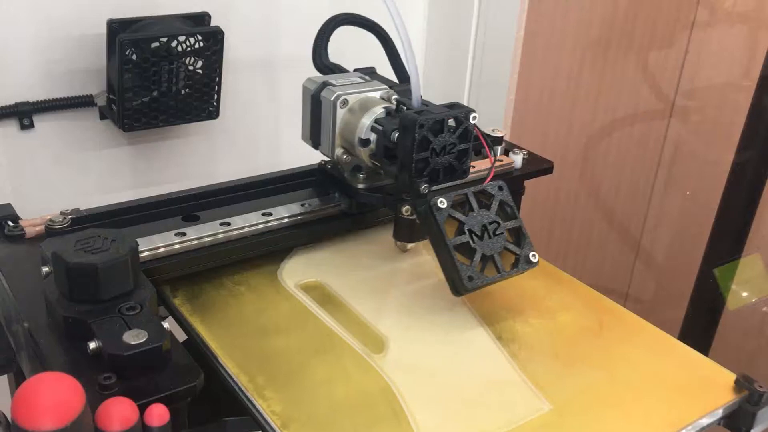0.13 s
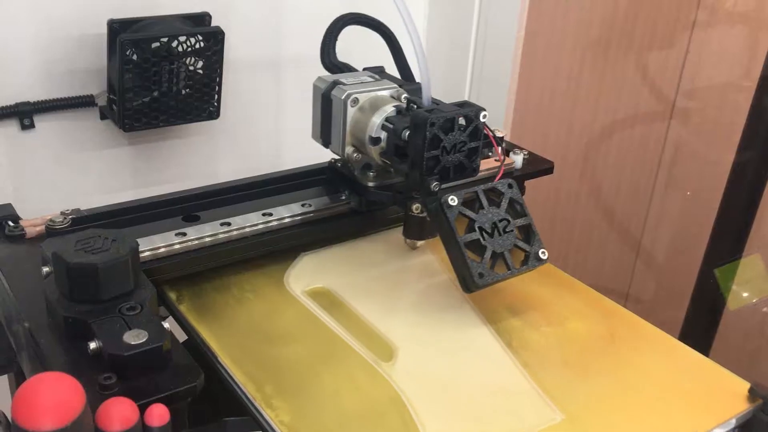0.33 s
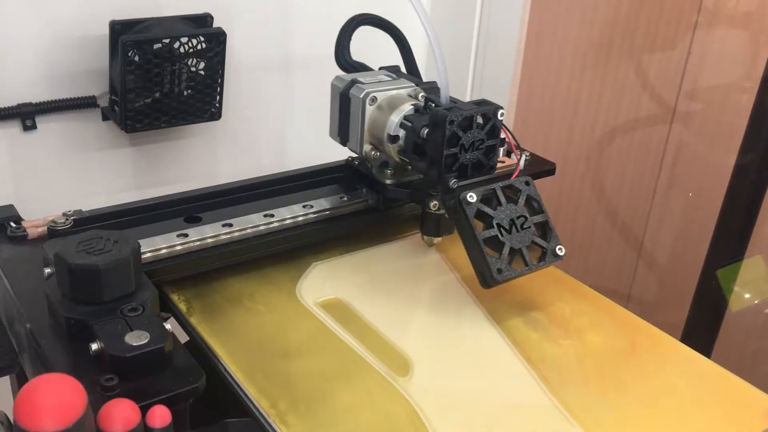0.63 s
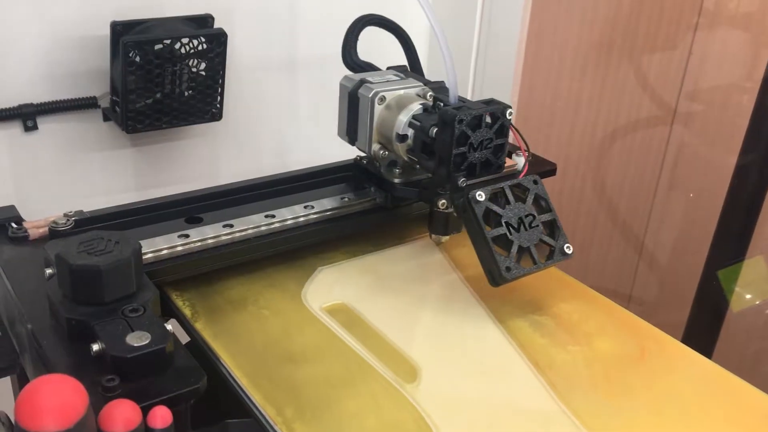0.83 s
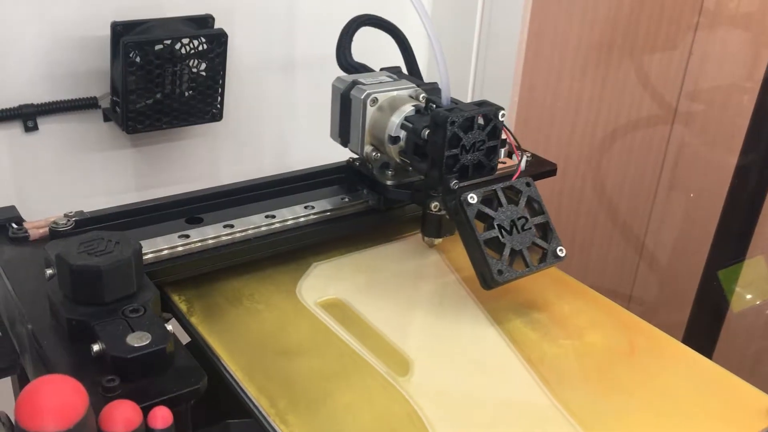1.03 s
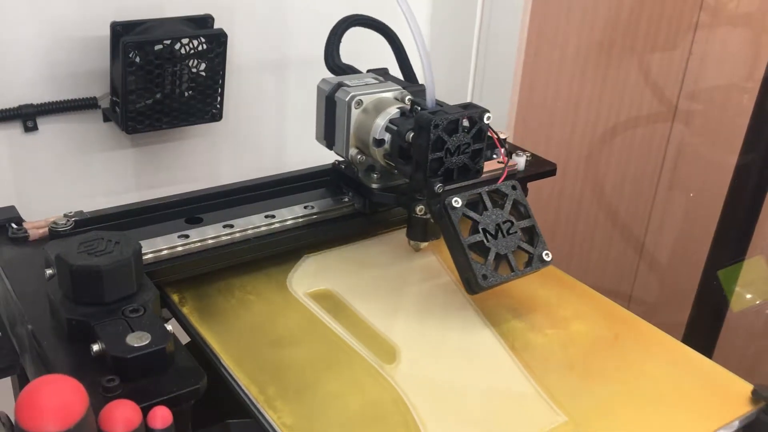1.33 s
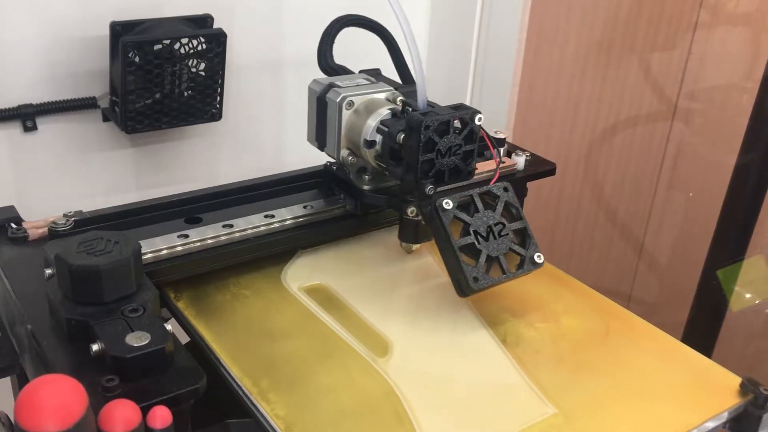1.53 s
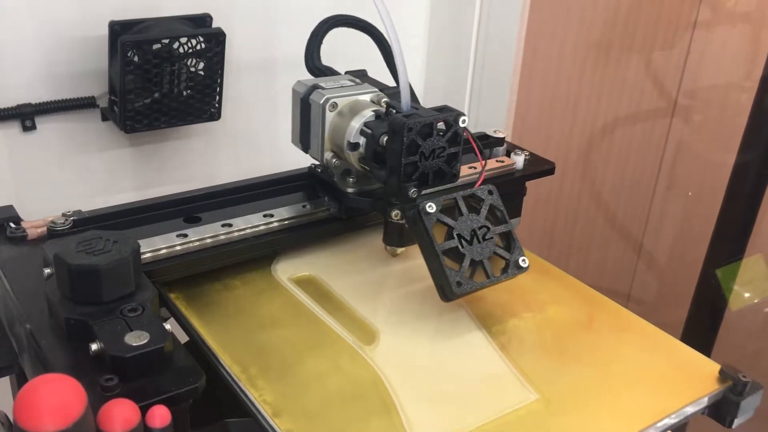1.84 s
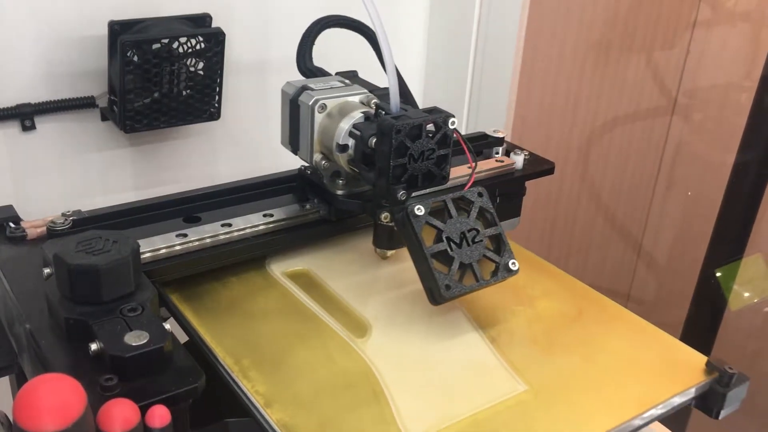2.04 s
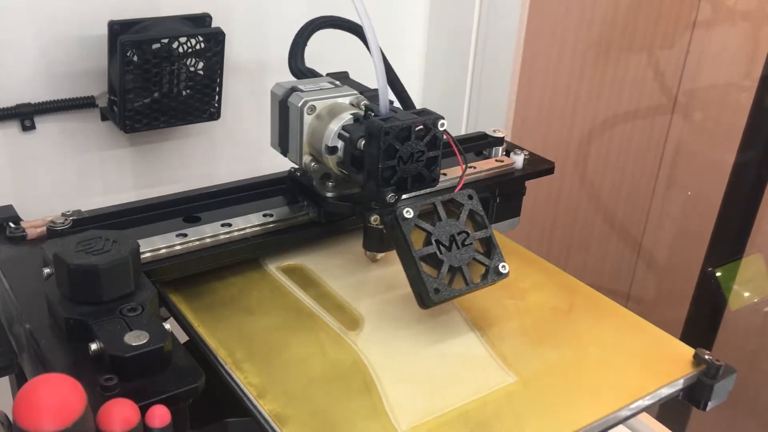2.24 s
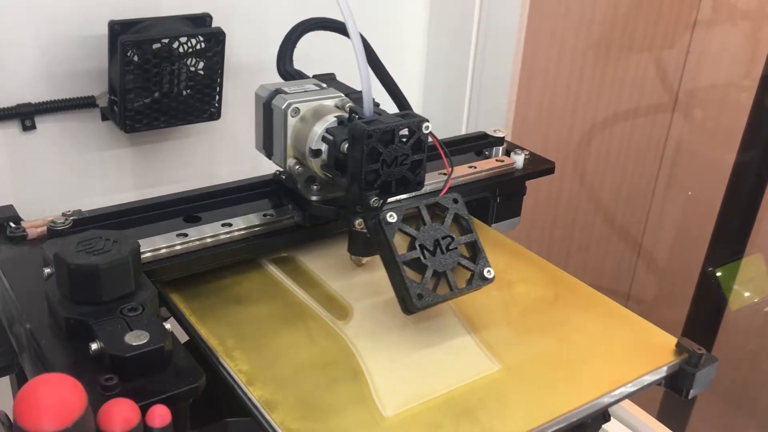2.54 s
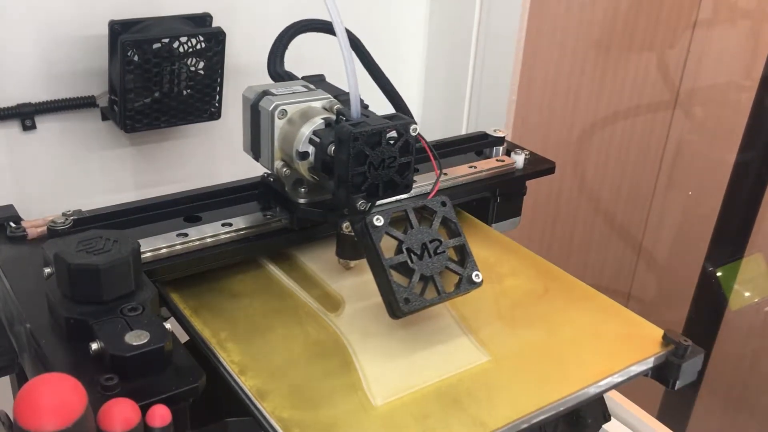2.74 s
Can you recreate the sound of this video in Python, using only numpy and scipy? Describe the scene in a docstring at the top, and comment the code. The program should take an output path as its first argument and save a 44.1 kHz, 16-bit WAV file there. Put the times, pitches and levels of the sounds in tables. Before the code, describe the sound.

Close microphone on a 3D printer indoors; fans drone and whoosh while motors whine and hum, the head turns with a soft bump around one second, then a loose part buzzes more and more.

```python
"""Desktop 3D printer at work

Heard from close by in a small room: fan tones, as drifting sines, sing over a rush of shaped noise.
Stepper motors whine as near-steady sines and set the frame humming in close, beating lines and noise;
the whine pauses and soft noise bumps sound where the print head turns round. A faint high hiss passes early.
A loose part on the head buzzes in bursts of ticks, scratching and ringing ever more insistently.
"""
import sys
import numpy as np
from scipy import signal
from scipy.fft import rfft, irfft, next_fast_len
from scipy.io import wavfile
from scipy.ndimage import uniform_filter1d, map_coordinates

SR = 44100
rng = np.random.default_rng(int(sys.argv[2]) if len(sys.argv) > 2 else 0)


def generate_wav(sig):
    """Save sig (samples, or channels by samples) to the path in sys.argv[1] as 16-bit PCM at SR."""
    pcm = np.round(np.clip(np.atleast_2d(sig).T, -1, 1) * 32767).astype(np.int16)
    wavfile.write(sys.argv[1], SR, pcm)


N = 126567


def amp(db):
    """Logarithmic level: decibels to amplitude gain."""
    return 10 ** (np.asarray(db) / 20)


def unit(x):
    """Power normalisation: scale to rms 1."""
    return x / np.sqrt(np.mean(x ** 2) + 1e-20)


def clock():
    """Uniform sampling: the time of each sample in seconds."""
    return np.arange(N) / SR


def curve(rows):
    """Linear interpolation in time through (s, value) points."""
    return np.interp(clock(), *np.transpose(rows))


def wobble(rate):
    """Slow random modulation: a spline through normal deviates, rate knots per second."""
    knots = rng.standard_normal(int(N * rate / SR) + 4)
    return map_coordinates(knots, [clock() * rate], mode="nearest")


def filtered(x, response):
    """Linear filtering: the spectrum multiplied by a response of frequency."""
    size = next_fast_len(N + SR // 2)  # zero padding leaves room for the tail
    spectrum = rfft(x, size) * response(np.fft.rfftfreq(size, 1 / SR))
    return irfft(spectrum, size)[:N]


def colour(points):
    """Spectral envelope: a response through (Hz, dB) points on a log frequency axis."""
    f, db = np.transpose(points)
    return lambda hz: amp(np.interp(np.log(hz + 1), np.log(f + 1), db))


def noise(response):
    """Filtered Gaussian noise of rms 1."""
    return unit(filtered(rng.standard_normal(N), response))


def tone(hz, drift, rate=4.1):
    """Frequency modulation: a sine of rms 1; drift is a share of pitch, rate its knots per second."""
    pitch = hz * (1 + drift * wobble(rate))
    cycles = rng.random() + np.cumsum(pitch) / SR
    return np.sqrt(2) * np.sin(2 * np.pi * cycles)


def puff(s, width, hz, octaves, db):
    """Band-limited noise under a Gaussian envelope; both widths are standard deviations."""
    band = noise(lambda f: np.exp(-.5 * (np.log2((f + 1) / hz) / octaves) ** 2))
    envelope = np.exp(-.5 * ((clock() - s) / width) ** 2)
    return amp(db) * envelope * band


def walls(x):
    """Early reflections from close walls: convolution with decaying noise, low frequencies reduced."""
    level_db, t60_s, delay_s, low_hz = -6, 0.058, 0.00183, 2180
    t = clock()[:SR // 8]
    echoes = rng.standard_normal(len(t)) * amp(-60 * t / t60_s) * (t > delay_s)
    wet = signal.fftconvolve(x, echoes / np.linalg.norm(echoes))[:N]
    return x + amp(level_db) * filtered(wet, lambda hz: hz ** 2 / (hz ** 2 + low_hz ** 2))


def step_whine():
    """Periodic stepping force: a fundamental and its octave, each with its own level and drift."""
    whine_hz = 3006.6
    # fundamental: t/s, level/dB
    fundamental_level = [(.08, -40), (.25, -47), (.5, -38.5), (.83, -34.5), (.925, -36), (.952, -79),
                         (1.035, -62), (1.046, -35.5), (1.25, -35.5), (1.5, -41), (1.66, -47.5), (1.9, -41),
                         (2.1, -38.5), (2.87, -40)]
    # octave: t/s, level/dB
    octave_level = [(.1, -56.5), (1.5, -54), (2.2, -49), (2.87, -46.5)]
    fundamental = amp(curve(fundamental_level)) * tone(whine_hz, 0.000209)
    octave_gain = amp(curve(octave_level) + 1.3 * wobble(40))
    return fundamental + octave_gain * tone(2 * whine_hz, 0.001675, rate=150)


def frame_hum():
    """Resonance and beats: close low lines and resonant noise share one level."""
    # hum of the frame: t/s, level/dB
    hum_level = [(.1, -42), (.5, -39), (.9, -43.5), (1.05, -38), (1.35, -42.5), (1.78, -38.5), (1.87, -36),
                 (2.0, -34), (2.2, -37), (2.87, -36)]
    # lines of the hum: f/Hz, level relative to the hum/dB
    lines = [(276.5, -5), (293.5, -10.5), (376, -26)]
    # frame resonance: f/Hz, relative density/dB per Hz
    resonance = [(200, -23), (255, -11), (278, -2), (298, 5), (320, -9), (350, -40.5), (450, -35)]
    hum = sum(amp(db) * tone(hz, .004, rate=8.08) for hz, db in lines)
    hum = hum + amp(-4.5) * noise(colour(resonance))
    return amp(curve(hum_level)) * hum


def axis_drone():
    """Periodic motor force: the second axis sounds one slowly drifting low sine."""
    # second axis motor: t/s, level/dB
    drone_level = [(.1, -62), (1.0, -61), (1.07, -57.5), (1.8, -53.5), (2.1, -54.5), (2.87, -52)]
    return amp(curve(drone_level)) * tone(188.2, 0.0022)


def driver_whistles():
    """Superposition of thin, high motor-driver tones, each fluctuating in pitch and level."""
    # driver whistles: f/Hz, level/dB
    whistles = [(14660, -63), (14756, -66), (14943, -62), (15131, -63), (15321, -66)]
    return sum(amp(db + 2 * wobble(15)) * tone(hz, 0.00057, rate=30) for hz, db in whistles)


def steppers():
    """Superposition of step whine, frame hum, second-axis drone and driver whistles."""
    return step_whine() + frame_hum() + axis_drone() + driver_whistles()


def burst_force():
    """Amplitude envelope: the loose part chatters faintly, and strongly during bursts."""
    attack_s, release_s = 0.00087, 0.0025
    # bursts of the loose part: start t/s, length/s, driving level/dB
    bursts = [(0.081, 0.018, -39), (0.123, 0.0087, -39), (0.134, 0.013, -37), (0.167, 0.028, -38.5),
              (0.225, 0.012, -37), (0.404, 0.0066, -36), (0.417, 0.014, -38), (0.451, 0.0084, -35.5),
              (0.498, 0.0081, -36.5), (0.515, 0.006, -39), (0.547, 0.007, -36), (0.558, 0.012, -36),
              (0.605, 0.014, -36), (0.638, 0.0072, -37), (0.653, 0.016, -36.5), (0.684, 0.0095, -36),
              (0.735, 0.0045, -38), (0.779, 0.0065, -39), (0.796, 0.0086, -38.5), (0.826, 0.005, -37),
              (0.842, 0.01, -38.5), (0.873, 0.023, -38), (0.919, 0.006, -40), (0.936, 0.005, -34),
              (0.943, 0.01, -39), (0.983, 0.013, -38), (1.01, 0.022, -39), (1.04, 0.007, -38),
              (1.107, 0.0064, -36.5), (1.142, 0.017, -39.5), (1.185, 0.006, -39), (1.2, 0.005, -37),
              (1.232, 0.021, -39.5), (1.269, 0.0064, -37), (1.292, 0.0059, -37), (1.313, 0.037, -38.5),
              (1.362, 0.007, -36.5), (1.392, 0.0047, -40), (1.41, 0.005, -38), (1.457, 0.0073, -36),
              (1.491, 0.0071, -37), (1.536, 0.027, -36), (1.585, 0.027, -37), (1.621, 0.0088, -37.5),
              (1.643, 0.014, -38), (1.666, 0.01, -38), (1.696, 0.011, -38), (1.713, 0.006, -39),
              (1.729, 0.037, -37.5), (1.775, 0.027, -40.5), (1.81, 0.0059, -34.5), (1.852, 0.01, -37),
              (1.894, 0.016, -37), (1.936, 0.028, -37.5), (1.975, 0.005, -39), (1.985, 0.022, -39.5),
              (2.023, 0.036, -36.5), (2.066, 0.059, -36.5), (2.139, 0.029, -36.5), (2.177, 0.0058, -38),
              (2.19, 0.024, -34.5), (2.223, 0.0061, -35), (2.237, 0.018, -35.5), (2.273, 0.03, -35.5),
              (2.326, 0.034, -35.5), (2.369, 0.031, -36.5), (2.414, 0.014, -34.5), (2.445, 0.071, -35),
              (2.523, 0.109, -35.5), (2.643, 0.032, -36), (2.685, 0.02, -35), (2.711, 0.18, -36)]
    t = clock()
    force = amp(-53.5 + 4 * wobble(61.54))  # idle chatter, dB
    for start, length, db in bursts:
        rise = (t - start) / attack_s
        fall = (start + length - t) / release_s
        gate = np.clip(np.minimum(rise, fall) + .5, 0, 1)
        force = np.maximum(force, amp(db) * gate)
    return force


def tick_train():
    """Quasi-periodic impacts: impulses with irregular intervals and sizes."""
    tick_hz, scatter_s, spread_db = 214.2, .0005, 1.5
    chance = rng.standard_normal(size=(1000, 2))
    intervals = np.abs(1 / tick_hz + scatter_s * chance[:, 0])
    at = (np.cumsum(intervals) * SR).astype(int)
    return np.bincount(at, amp(spread_db * chance[:, 1]), N)[:N]


def loose_modes(f):
    """Modal superposition: damped resonances of alternating sign."""
    # ringing of the loose part: f/Hz, bandwidth/Hz, gain/dB
    modes = [(6000, 140, -10), (7070, 220, 1), (7246, 257, 6), (7090, 140, -10), (9630, 220, -20),
             (11400, 220, -18), (14950, 340, -5), (15700, 180, -14)]
    response = 0
    for k, (centre, width, db) in enumerate(modes):
        damping = 1j * f * width
        response = response + (-1) ** k * amp(db) * damping / (centre * centre - f * f + damping)
    return response


def rattle():
    """Impact excitation: ticks gate scratchy contact noise and excite the modes of the loose part."""
    tick_t60_s = 0.029
    # scratchy part of each tick: f/Hz, relative density/dB per Hz
    scratch_spectrum = [(1000, -12), (2500, -4), (4000, -3), (5050, -6), (5500, 1.5), (6100, 2.5),
                        (6600, 1.5), (7400, -1.5), (7900, -12), (8550, -6.5), (8900, -17), (9600, 0),
                        (10450, -12.5), (11100, -3.5), (11500, -6), (12000, -1.5), (12600, -11.5),
                        (14000, -10), (15050, -14), (15700, 0)]
    # ringing, freer late in the stroke: t/s, level relative to the driving force/dB
    ring_level = [(.1, -13.5), (1.4, -10.5), (2, -10.5), (2.35, -5.5), (2.55, -3), (2.87, -1.5)]
    force = burst_force()
    ticks = tick_train()
    decay = amp(-60 * clock()[:SR // 20] / tick_t60_s)
    contact = unit(signal.fftconvolve(ticks, decay)[:N])
    scratch = force * contact * noise(colour(scratch_spectrum))
    ring = force * unit(filtered(ticks, loose_modes))
    return walls(amp(-1) * scratch + amp(curve(ring_level)) * ring)


def jolts():
    """Transient excitation: jolts of the head shake the frame and table as short noise bands."""
    # jolts, mostly where the head turns round: t/s, width/s, f/Hz, bandwidth/octaves, level/dB
    bumps = [(.99, 0.015, 292, 0.23, -36), (.99, 0.018, 534, 0.17, -39.5),
             (1.03, 0.0037, 2030, 0.14, -37.5), (1.08, 0.069, 86, .65, -46.5),
             (2.25, 0.018, 530, 0.071, -46)]
    return sum(puff(*row) for row in bumps)


def swish():
    """Band noise under a bell envelope: a faint high hiss swells and fades early in the first stroke."""
    # hisses: t/s, width/s, f/Hz, bandwidth/octaves, level/dB
    swishes = [(.22, 0.2, 8400, 0.94, -48), (.38, 0.13, 9050, 0.074, -54.5)]
    return sum(puff(*row) for row in swishes)


def fan_tones():
    """Rotational tones: shaft and blade frequencies of several fans, shaken by turbulence."""
    flutter_db, rough_db = 0.75, 0.96
    # steady fan tones: f/Hz, level/dB
    partials = [(120.3, -68.5), (130.6, -55.5), (842, -37.5), (914.2, -43.5), (958.2, -36.5), (1095, -51),
                (1685, -60), (1828.4, -49.5), (2190, -53.5), (2526, -55), (2740, -59.5), (3368, -56.5)]
    total = 0
    for hz, db in partials:
        level = db + flutter_db * wobble(24.7) + rough_db * wobble(160)
        total = total + amp(level) * tone(hz, 0.000794, rate=14.6)
    return total


def air_rush():
    """Broadband flow noise: level fluctuates in patches of time and frequency."""
    patchy_db = 1.62
    # rush of air: f/Hz, relative density/dB per Hz
    air_spectrum = [(15, -60), (30, -41), (55, -9.5), (95, -19), (112, -13), (160, -20), (210, -21.5),
                    (340, -13), (460, -16), (540, -10), (600, -16), (680, -13), (745, -7.5), (800, -16),
                    (870, -8), (1030, -12), (1100, -4), (1200, -2.5), (1255, -8), (1300, -8), (1350, -8),
                    (1400, -6.5), (1620, -12.5), (1800, -11), (2100, -11), (2700, -16), (3300, -15.5),
                    (4000, -19), (4500, -20.5), (4950, -25.5), (5400, -21), (6600, -27), (8000, -27),
                    (9600, -26), (10500, -33.5), (11800, -28), (12700, -36), (14000, -33), (14750, -26.5),
                    (15600, -30.5)]
    z = signal.stft(noise(colour(air_spectrum)), nperseg=512)[2]
    field = uniform_filter1d(rng.standard_normal(z.shape), size=6, axis=0)  # across frequency
    field = uniform_filter1d(field, size=12, axis=1)  # across time
    air = signal.istft(z * amp(patchy_db * unit(field)), nperseg=512)[1][:N]
    return amp(-37.5) * unit(walls(air))


def fans():
    """Superposition of tonal and broadband fan noise."""
    return fan_tones() + air_rush()


def scene():
    """Linear superposition of all parts of the printer."""
    return (steppers() + rattle() + jolts() + swish() + fans())[None]


def record(dry):
    """Gating and band limitation: a linear fade-in, then a sharp low-pass."""
    start_s, fade_s, top_hz = .073, 0.016, 15760
    opened = dry[0] * np.clip((clock() - start_s) / fade_s, 0, 1)
    return filtered(opened, lambda hz: hz < top_hz)[None]


dry = scene()
out = record(dry)
generate_wav(out)
```